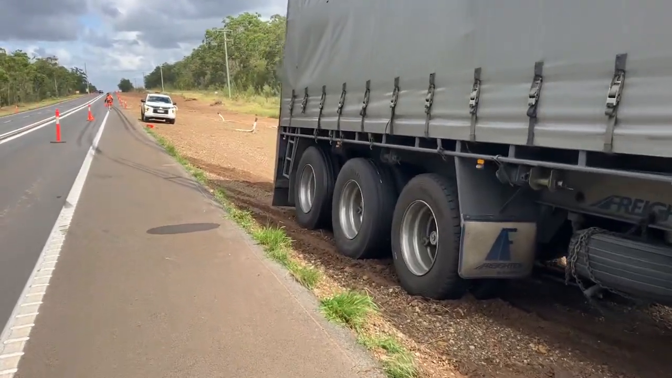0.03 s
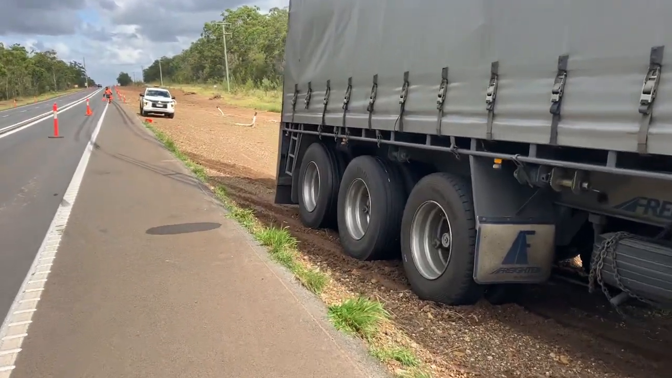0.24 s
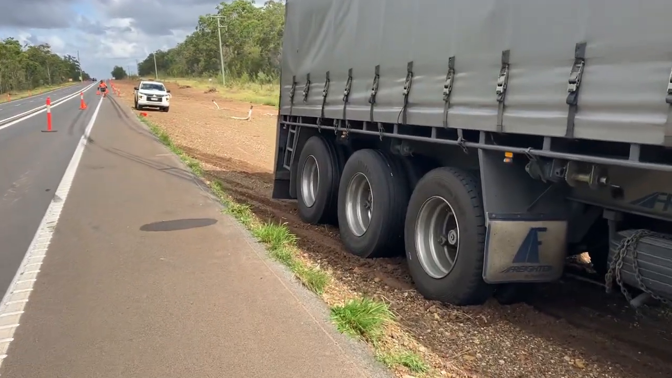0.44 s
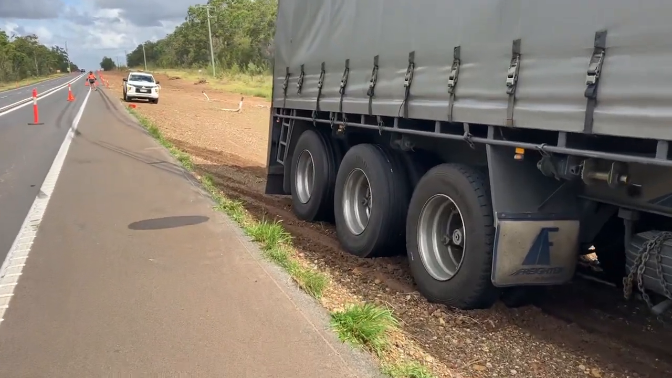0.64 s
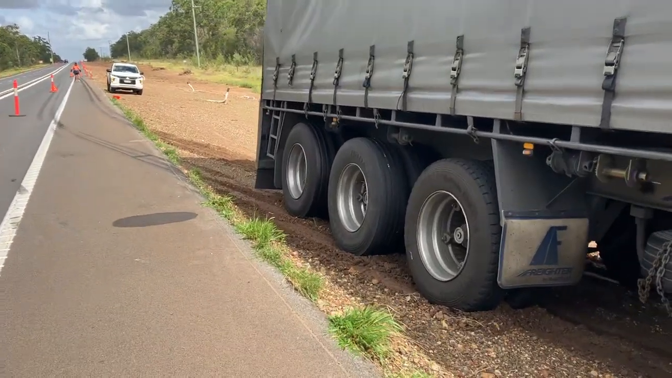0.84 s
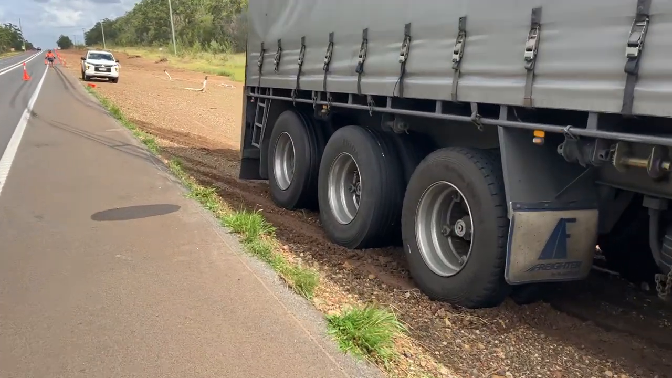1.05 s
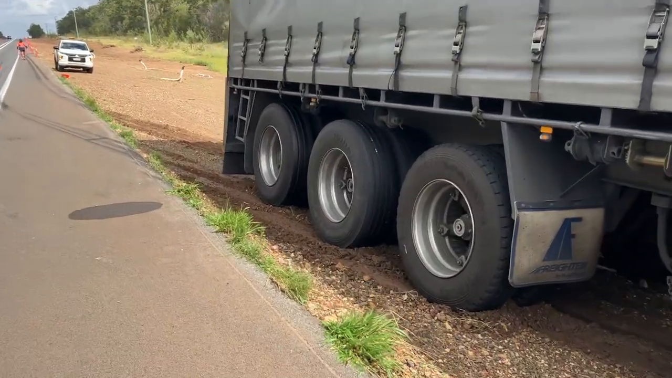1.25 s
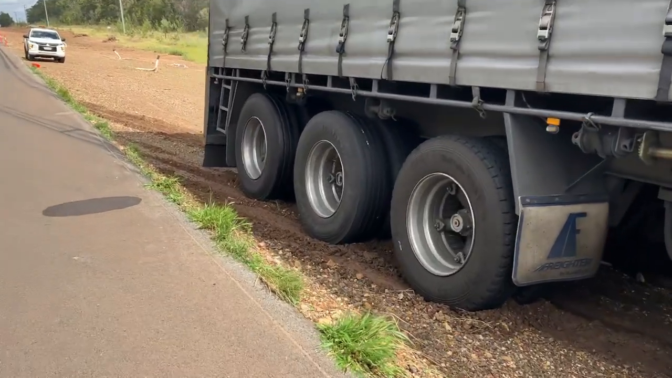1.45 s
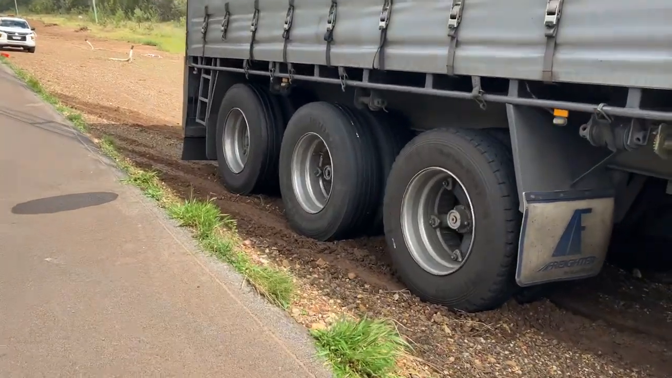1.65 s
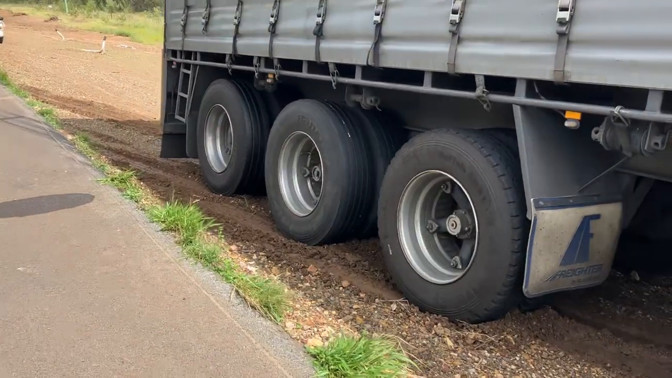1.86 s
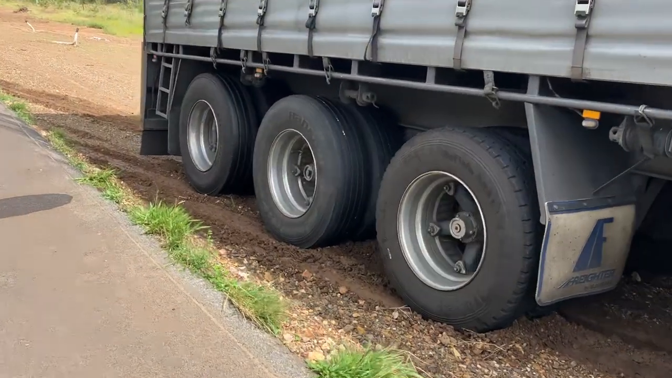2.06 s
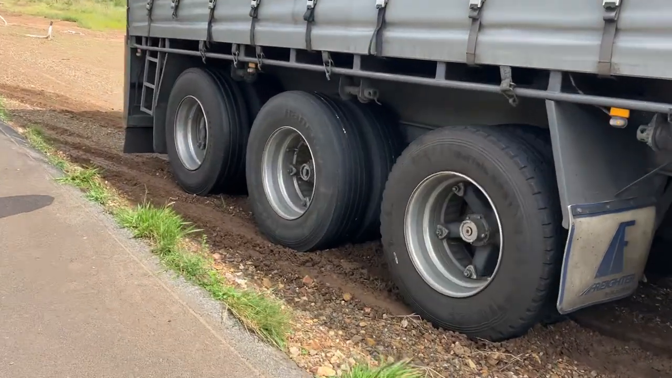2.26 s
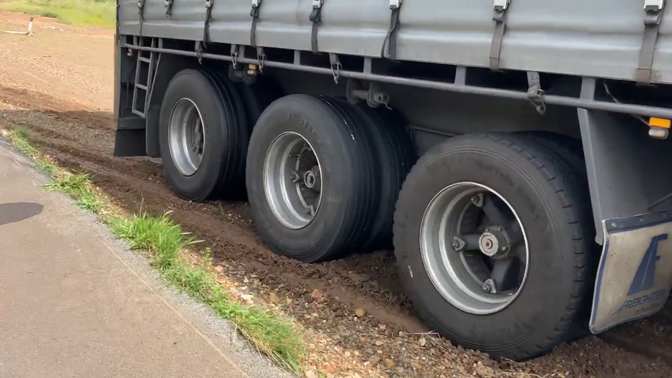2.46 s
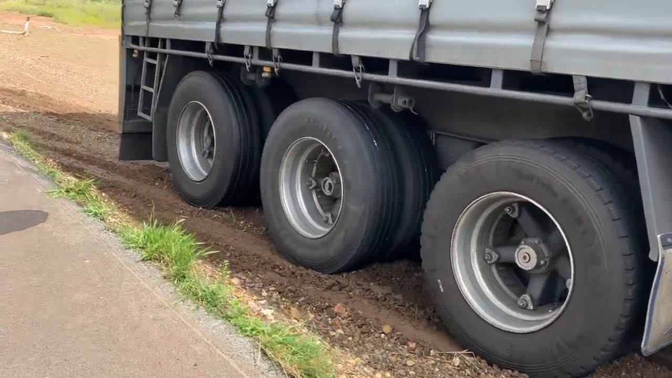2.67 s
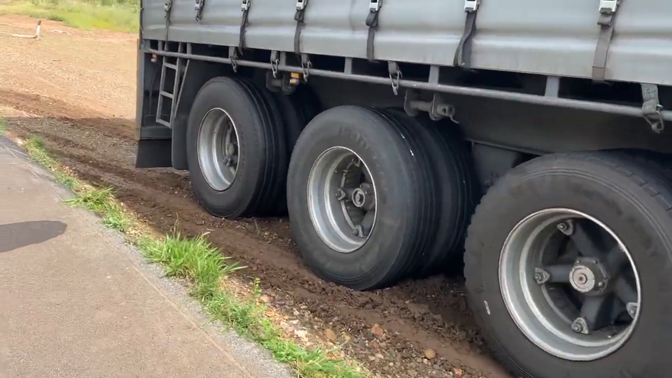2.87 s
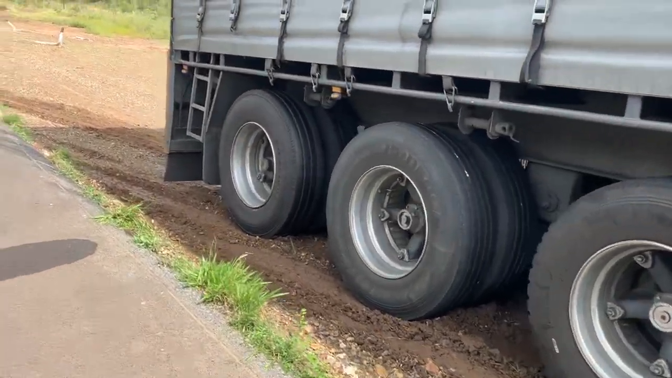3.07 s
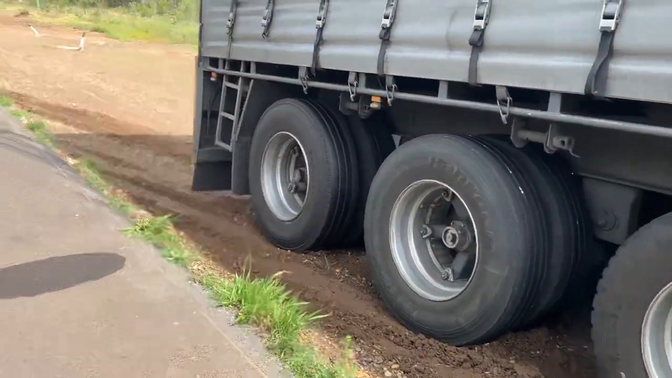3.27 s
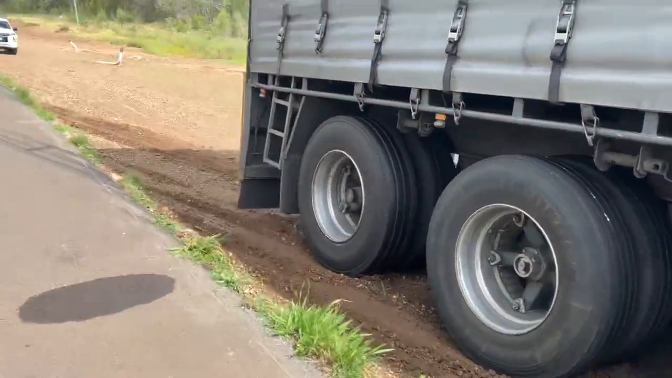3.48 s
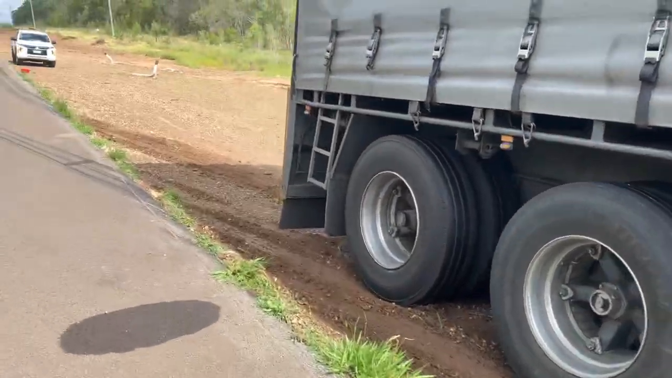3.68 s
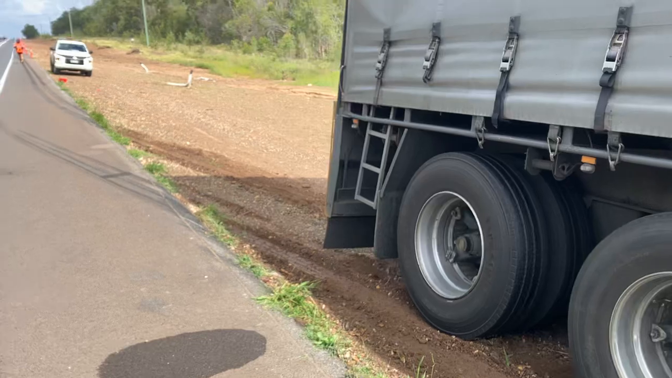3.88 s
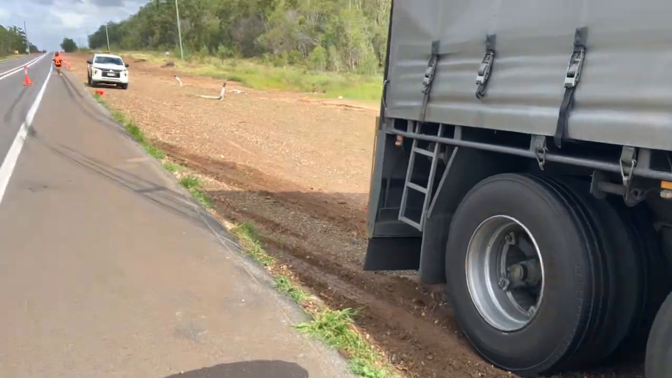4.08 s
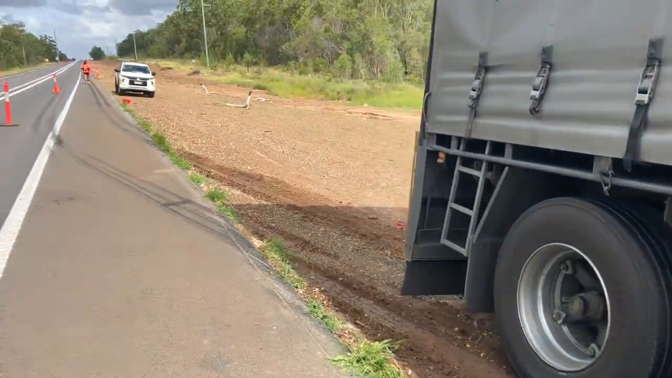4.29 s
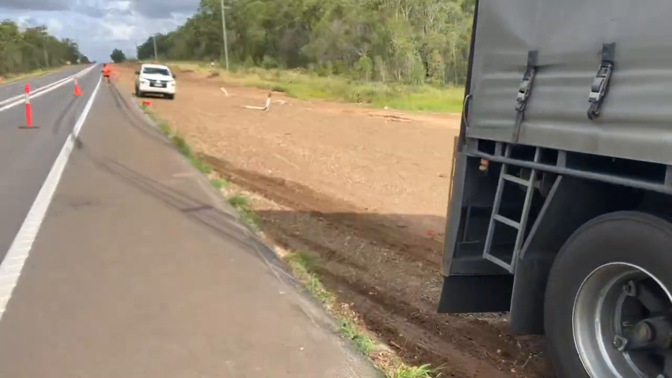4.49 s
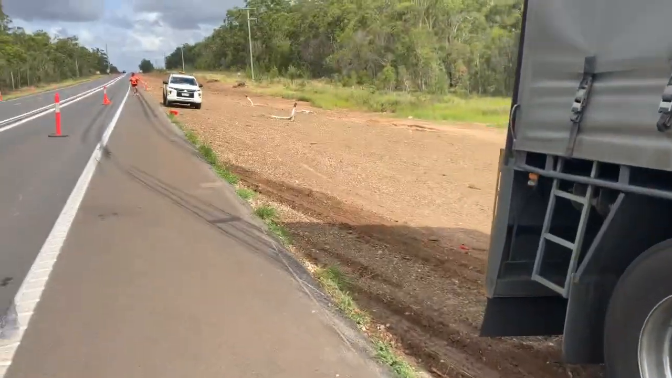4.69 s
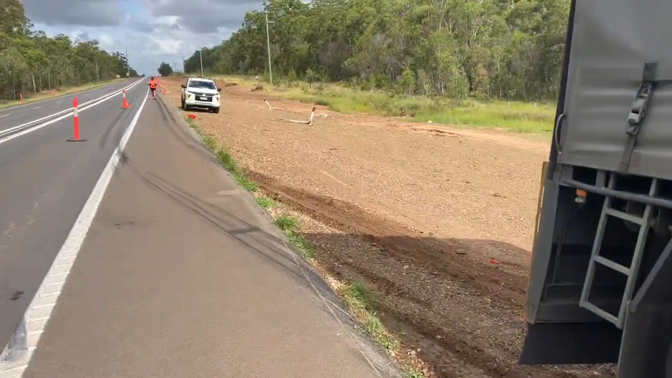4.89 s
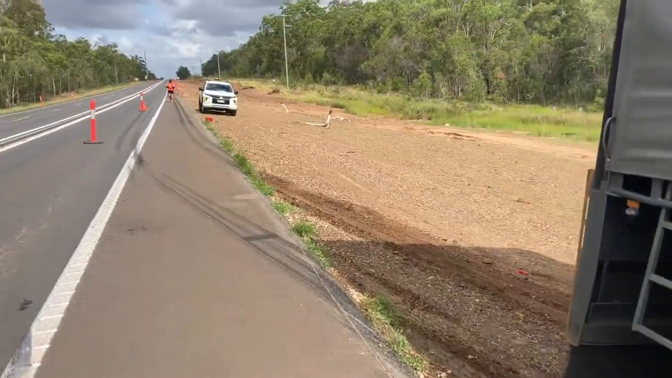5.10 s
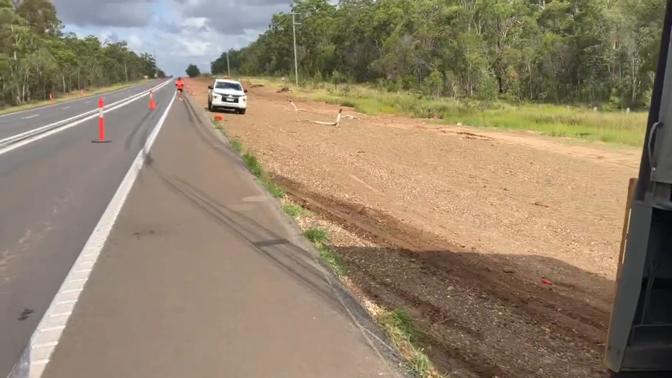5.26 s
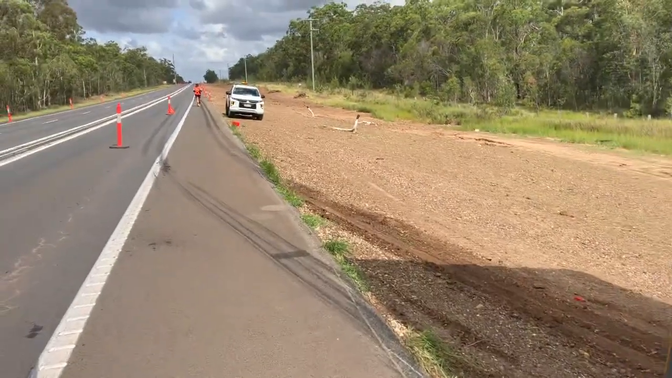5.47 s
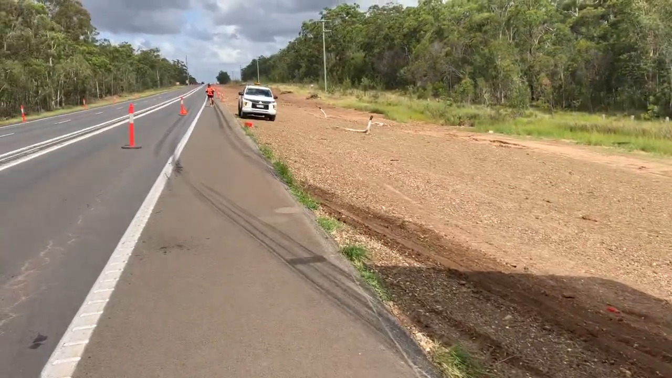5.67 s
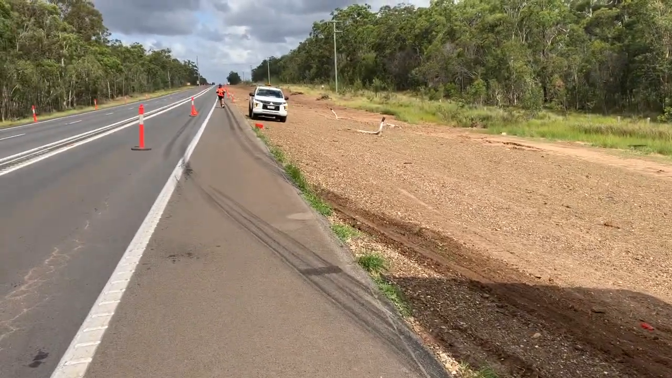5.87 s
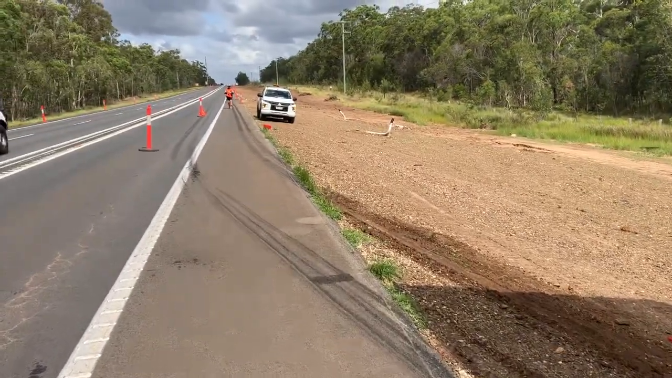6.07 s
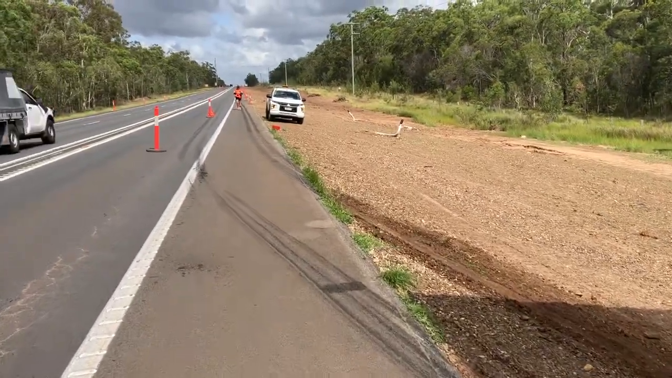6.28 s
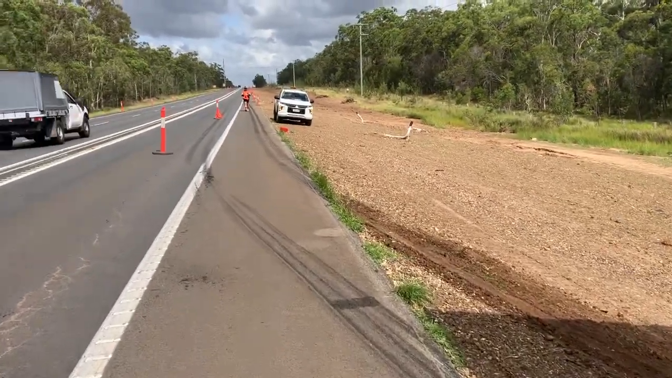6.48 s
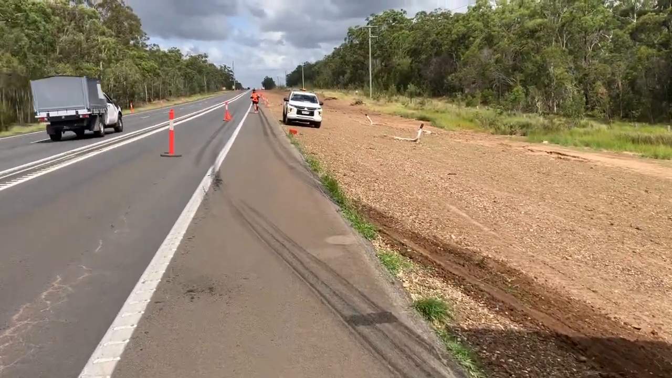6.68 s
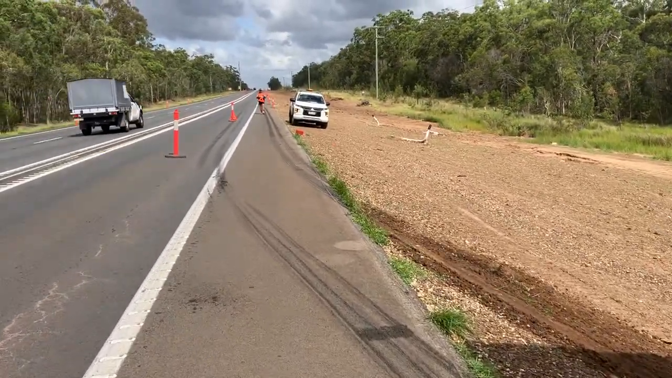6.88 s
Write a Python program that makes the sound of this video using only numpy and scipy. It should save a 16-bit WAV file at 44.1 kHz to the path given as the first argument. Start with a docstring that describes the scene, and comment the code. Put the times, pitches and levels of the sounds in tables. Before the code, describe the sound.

A diesel semi-trailer rumbles low on a gravel shoulder while a light truck rushes past on the left, peaking near five seconds, then fading.

```python
"""A light utility truck overtakes on the left: engine tones and noise, ringing boom and tyre roar, with Doppler on
the tones and boom, rise as it nears and fade up the road; an echo off a trailer's side combs them.
Beside it on the highway shoulder a diesel semi-trailer creeps over gravel: its exhaust note, overtones,
rumble, whirr and clatter come from sines and coloured noise; its firing rate picks up once, then holds.
Stones snap, a buckle ticks once and the roadside hisses faintly, all heard by a pair of microphones."""
import sys
import numpy as np
from scipy import signal
from scipy.fft import rfft, irfft, next_fast_len
from scipy.io import wavfile
from scipy.ndimage import uniform_filter1d, map_coordinates

SR = 44100
rng = np.random.default_rng(int(sys.argv[2]) if len(sys.argv) > 2 else 0)


def waveform_to_disk(signal):
    """Save audio, clipped to [-1, 1], as 16-bit WAV at the path in sys.argv[1]."""
    frames = np.transpose(np.atleast_2d(signal))
    scaled = np.clip(frames, -1, 1) * 32767
    samples = np.round(scaled).astype(np.int16)
    wavfile.write(sys.argv[1], SR, samples)


N = 306054
TIME = np.arange(N) / SR  # s

# Spectra called "noise colour" hold only relative levels: the noise is scaled to rms 1 afterwards.
# Level at which the diesel's exhaust note is heard, with sudden dips: start_s, level_db (before NOTE_DB)
DIESEL_NOTE_LEVEL = [(0.0, -38), (0.6, -46.5), (0.93, -29), (1.22, -43.5), (1.45, -32), (2.72, -28),
                     (2.82, -34.5), (3.81, -39), (3.92, -28.5), (4.27, -39.5), (4.31, -31), (4.52, -31),
                     (4.62, -45), (4.87, -28), (5.64, -25), (5.74, -33), (6.01, -23), (6.24, -33),
                     (6.4, -28), (6.75, -38.5), (6.9, -25.5), (6.94, -25)]
# Wavering tones of the diesel: multiple of the crank rate, level_db
DIESEL_ORDERS = [(1.5, -58), (4, -64), (4.6, -46), (5.9, -53), (10.6, -51)]
# Noise colour of the diesel's rumble: pitch_hz, level_db per Hz
RUMBLE_COLOUR = [(18, -36), (30, -8), (42, -1), (60, 3.5), (95, 1), (130, 2), (200, -3), (260, -4),
                 (400, -13.5), (475, -13.5), (600, -19.5), (1200, -54), (3000, -85)]
# Noise colour of the diesel's clatter: pitch_hz, level_db per Hz
CLATTER_COLOUR = [(300, -4), (600, 2), (1100, 1), (1500, -.7), (1850, 4.5), (2600, -6.5), (3350, -11.5),
                  (3900, -10.5), (6000, -21.5), (10000, -61)]
# Noise colour of the bright band of the diesel's machinery: pitch_hz, level_db per Hz
WHIRR_COLOUR = [(1600, -27), (2000, -5), (2400, 3), (2900, -1), (3400, -2), (3800, -20), (5000, -45)]
# The whirr swells, drops, then fades as the cab moves away: start_s, level_db
WHIRR_LEVEL = [(0, -63.5), (.7, -62), (1.12, -60), (1.38, -65), (2.2, -66), (3.5, -69)]
# The diesel's overtones: pitch_hz (at a firing rate of DIESEL_HZ), level_db (before the swell)
DRONE_TONES = [(137, -52), (157, -45.5), (179, -44), (198, -43), (321, -51), (481, -55.5)]
# Level at which those overtones are heard: start_s, level_db (gain)
DRONE_SWELL = [(0, -5.5), (1.1, -4.5), (1.8, 0), (2.9, 1.5), (3.9, 9), (4.4, 8), (4.7, 7), (5.2, 9.5),
               (5.7, -4), (6.94, -5)]
# Noise colour of the open roadside: pitch_hz, level_db per Hz
AIR_COLOUR = [(300, -10), (1000, 6), (3000, 2), (5500, -.5), (7700, 3.5), (9000, 3), (10700, -1),
              (12000, -7), (13500, -20), (16000, -32)]
# Gravel snapping under the trailer: start_s, level_db (initial gain of the burst)
STONES = [(0.4449, -43), (0.4663, -44), (1.0294, -47), (2.3761, -43), (2.8171, -46), (2.8365, -47),
          (3.3992, -47), (3.5494, -55), (3.9759, -40), (4.5421, -38)]
# Noise colour of a stone's snap: pitch_hz, level_db per Hz
SNAP_COLOUR = [(1000, -20), (3500, -2), (8000, -11), (14000, 1)]
# Ringing of a small metal fitting: pitch_hz, level_db (relative)
CLINK_TONES = [(2900, 6), (3300, 4), (3700, 1), (4600, 4), (5100, 2), (5500, 2)]
# Level law of each sound of the passing truck, before its mix trim: level_db (abreast),
# fall_db (per doubling of distance), loss_db_per_m, rear_db (gain to the rear), abreast_s, nearest_m
CARRY = {"boom": (-26.5, 0.5, 0.35, -4, 5.5, 9), "engine note": (-29, 3, 0.2, 1.8, 5, 10),
         "engine growl": (-26.3, 5.5, 0.13, 2.5, 5, 7.5), "roar": (-24, 4, 0.16, 4.5, 5.1, 6.5),
         "rasp": (-37, 9.5, 0, 8.5, 5, 11), "hiss": (-41.9, 11, 0, 7, 5, 12.5)}
# Passing engine's tones: multiple of the crank rate, level_db (relative), extra_db (while alongside)
FIRING_TONES = [(2, -7, 0), (3, -10.5, 1), (4, -5.5, 11), (5, -16, 4)]
# Exhaust and body resonances: pitch_hz (before Doppler), width_hz, level_db (relative)
BOOM_RESONANCES = [(96.7, 33, -7), (149.1, 13, -2), (169.5, 6.6, -1), (185.2, 8.5, -2), (200, 16.5, -4)]
# Noise colour of the passing engine's growl: pitch_hz, level_db per Hz
GROWL_COLOUR = [(60, -30), (110, -5.5), (240, -2.5), (320, 0), (420, -3), (600, -12.5), (1000, -83)]
# Noise colour of the tyre roar: pitch_hz, level_db per Hz
ROAR_COLOUR = [(250, -57), (480, -6.5), (650, 1), (820, 1.5), (1000, -2), (1300, -2.5), (1900, -12.5),
               (2800, -35), (5000, -69)]
# Noise colour of the tread noise beamed ahead: pitch_hz, level_db per Hz
HORN_COLOUR = [(950, -12), (1300, 15), (1650, 12), (2100, 1), (2700, -14), (5000, -38)]
# The exhaust whines in tones tied to the engine's firing: pitch_hz (before Doppler), level_db (against the
# roar)
WHINE_TONES = [(626, -12.5), (780, -17), (1177, -18)]
# Noise colour of the rasp: pitch_hz, level_db per Hz
RASP_COLOUR = [(1100, -23), (1800, -2), (2300, 1), (3200, -6), (4000, -8.5), (6000, -24.5)]
# Noise colour of air rushing round the passing truck: pitch_hz, level_db per Hz
HISS_COLOUR = [(2800, -22), (4300, 0), (6000, -1.5), (7600, -1), (9500, -5), (12000, -8.5), (13200, -22),
               (14200, -30), (16000, -34)]
# The truck's bearing from the turning microphones: start_s, lead_ms (of the left microphone)
BEARING = [(0, 0.24), (3.2, 0.36), (4.1, 0.19), (4.6, 0.18), (5.1, 0.34), (5.4, 0.34), (5.75, 0.27),
           (6.2, 0.22), (6.55, 0.16), (6.94, 0.12)]
# The trailer's slack curtain returns little treble: pitch_hz, level_db (gain)
ECHO_RESPONSE = [(100, -7.5), (1800, -2.5), (3300, -8), (5000, -20), (9000, -40)]
# Left microphone while the truck is still behind: pitch_hz, level_db (gain)
SHADOW_RESPONSE = [(200, -2.5), (700, 0), (1400, -3.5), (2400, -5.5), (4000, -3), (8000, -6)]
# Left microphone once the truck is in the open: pitch_hz, level_db (gain)
FACING_RESPONSE = [(200, 2), (450, -1), (750, 2), (1500, 0.3), (4000, 0), (8000, -2)]
# Stereo width of the microphone pair: pitch_hz, level_db (side gain)
WIDTH_RESPONSE = [(60, 0.5), (150, -5), (280, -5), (500, 2.5), (900, 0), (1800, -1), (8000, 0.5)]

# the diesel's firing rate picks up once, then holds
DIESEL_SLOW_HZ, DIESEL_HZ, PICK_UP_S, PICK_UP_WIDTH_S = 58.53, 60.42, 1.1, 0.03
NOTE_DB, NOTE_FLUTTER_DB = -0.2, 1.0  # gain of the exhaust note, and its quick unsteadiness
TURN_S, TURN_WIDTH_S = 1.64, 0.22  # the microphones turn from the engine towards the trailer's wheels
CLATTER_DB, CLATTER_TURNED_DB, CLATTER_DB_PER_S = -52.5, -2, 0.73  # start, change at the turn, growth
DIESEL_LEAD_MS, DIESEL_TURNED_LEAD_MS = 0.34, 0.22  # lead of the left microphone before and after the turn
BUCKLE_S, BUCKLE_T60_S = 2.851, 0.02
SOUND_SPEED_M_S = 343
SPEED_M_S, GAP_M, ABREAST_S = 20, 7, 5.23  # the truck's straight drive past the microphones
OPEN_S, OPEN_WIDTH_S, CLOSE_S, CLOSE_WIDTH_S = 4.79, 0.015, 5.71, 0.072  # its engine blares alongside
WHINE_FRONT_DB = -5  # the exhaust whine is weaker while it approaches
BEAM_S, BEAM_WIDTH_S = 4.64, 0.27  # the tyres' forward beam sweeps over the microphones
CLEAR_S, CLEAR_WIDTH_S = 5.11, 0.18  # from here on the truck is in front of the microphones, in the open
SCATTER_BEHIND_DB, SCATTER_AHEAD_DB = -1, -18  # gain of the sound scattered by the roadside
WAKE_BEHIND_DB, WAKE_AHEAD_DB = 1, -5.5  # gain of the air hiss that comes from all round
ECHO_S, ECHO_WIDTH_S = 5.74, 0.12  # the trailer's echo strengthens once the truck is well ahead
ECHO_BEHIND, ECHO_AHEAD = 0.029, 0.63  # echo strength before and after
ECHO_MS, ECHO_MS_PER_S = 1.494, 0.19  # echo delay when abreast, and its growth
ECHO_LEAD_MS = 0.1  # the echo arrives from nearly straight ahead
SHARED_HZ, SHARED_WIDTH_HZ = 6960, 530  # above this both channels carry the same treble
SHARED_LAG_S, IN_PHASE_HZ = 0.000225, 7050
TOP_HZ = 15800  # band limit of the microphones


def amp(db):
    """Decibels to gain."""
    return 10 ** (np.asarray(db) / 20)


def unit(x):
    """Scale to rms 1."""
    return x / np.sqrt(np.mean(x ** 2) + 1e-20)


def shape(points, hz):
    """Gain at hz, read between (pitch_hz, level_db) points on a log axis."""
    point_hz, db = np.transpose(points)
    return amp(np.interp(np.log(hz + 1), np.log(point_hz + 1), db))


def curves(rows):
    """One value per sample for each column after the time."""
    start_s, *columns = np.transpose(rows)
    return [np.interp(TIME, start_s, column) for column in columns]


def wobble(rate):
    """A smooth random curve with rate knots a second."""
    knots = rng.standard_normal(int(N * rate / SR) + 4)
    return map_coordinates(knots, [TIME * rate])


def step(at, width):
    """A smooth change from 0 to 1 around a moment."""
    return (1 + np.tanh((TIME - at) / (2 * width))) / 2


def blend(before, after, share):
    """Go from one value to another as share goes from 0 to 1."""
    return before + (after - before) * share


def filtered(x, response):
    """Sound x through a response of frequency."""
    size = next_fast_len(N + SR // 4)
    spectrum = rfft(x, size) * response(np.fft.rfftfreq(size, 1 / SR))
    return irfft(spectrum, size)[..., :N]


def noise(colour, channels=1):
    """Coloured noise of rms 1, unrelated between channels."""
    white = rng.standard_normal((channels, N))
    return unit(filtered(white, lambda hz: shape(colour, hz)))


def read(x, when):
    """The sound x at the given times."""
    return map_coordinates(x, [when * SR], mode="mirror")


def pair(x, lead_ms):
    """A source on the left reaches the left microphone first."""
    half_s = lead_ms / 2000
    return np.array([read(x, TIME + half_s), read(x, TIME - half_s)])


def diesel_rate():
    """The diesel's firings per second."""
    return blend(DIESEL_SLOW_HZ, DIESEL_HZ, step(PICK_UP_S, PICK_UP_WIDTH_S))


def diesel():
    """Six cylinders: a deep exhaust note, wavering crank orders, rumble, whirr and clatter pulsing with firing."""
    note_db, = curves(DIESEL_NOTE_LEVEL)
    whirr_db, = curves(WHIRR_LEVEL)
    turned = step(TURN_S, TURN_WIDTH_S)
    firing = 2 * np.pi * np.cumsum(diesel_rate()) / SR
    crank = firing / 3  # a four-stroke six fires three times a turn
    note_gain = amp(note_db + NOTE_DB + NOTE_FLUTTER_DB * wobble(12))
    note = note_gain * np.sqrt(2) * np.sin(firing)
    orders = 0
    for multiple, db in DIESEL_ORDERS:
        gain = amp(db + 3.2 * wobble(5))
        orders = orders + gain * np.sqrt(2) * np.sin(multiple * crank + 0.81 * wobble(6))
    clatter_db = CLATTER_DB + CLATTER_TURNED_DB * turned + CLATTER_DB_PER_S * TIME
    clatter = amp(clatter_db) * unit(noise(CLATTER_COLOUR)[0] * (1 + 0.29 * np.sin(firing)))
    whirr = amp(whirr_db + 0.85 * wobble(13)) * noise(WHIRR_COLOUR)[0]
    # part of the rumble is common to both microphones, part is unrelated
    rumble = amp(-40) * noise(RUMBLE_COLOUR)[0] + amp(-44) * noise(RUMBLE_COLOUR, channels=2)
    lead_ms = blend(DIESEL_LEAD_MS, DIESEL_TURNED_LEAD_MS, turned)
    return pair(note + orders + clatter + whirr, lead_ms) + rumble


def drone(rough, rough_per_khz):
    """Close engine overtones throb against each other and swell; the higher ones are more broken."""
    swell_db, = curves(DRONE_SWELL)
    turns = 2 * np.pi * np.cumsum(diesel_rate() / DIESEL_HZ) / SR
    tones = 0
    for hz, db in DRONE_TONES:
        waver = rough * wobble(5) + rough_per_khz * hz / 1000 * wobble(26)
        tones = tones + amp(db + 2.3 * wobble(8)) * np.sqrt(2) * np.sin(hz * turns + waver)
    return pair(amp(swell_db) * tones, lead_ms=0.54)


def air():
    """A faint, nearly even hiss of the open roadside, unrelated between the microphones."""
    return amp(-58.5 + 0.45 * wobble(5.64)) * noise(AIR_COLOUR, channels=2)


def gravel(life_s, grit_db, grains_per_s, spread_db):
    """Stones snap as dying noise bursts under the creeping wheels, over a faint random crackle of grit."""
    blows = 0
    for start_s, db in STONES:
        decay = np.exp(-np.abs(TIME - start_s) / life_s)
        blows = blows + amp(db) * (TIME >= start_s) * decay
    grain_gain = amp(spread_db * np.minimum(rng.exponential(size=N), 3))
    grains = (rng.random(N) < grains_per_s / SR) * grain_gain
    grit = amp(grit_db) * signal.lfilter([1], [1, -np.exp(-1 / (life_s * SR))], grains)
    grit_colour = [(1000, -13), (3500, 22), (8000, 9), (15000, -25)]  # pitch_hz, level_db per Hz
    return blows * noise(SNAP_COLOUR, channels=2) + grit * noise(grit_colour, channels=2)


def clink(at, db, t60):
    """A strap buckle on the trailer ticks once: roughened metal tones with a fast attack and decay."""
    since = np.maximum(TIME - at, 0)
    ring = 0
    for hz, level_db in CLINK_TONES:
        ring = ring + amp(level_db) * np.sin(2 * np.pi * hz * since + 2.6 * wobble(900))
    attack = 1 - np.exp(-since / 0.00046)
    return amp(db - 60 * since / t60) * attack * ring


def emission_time(speed, gap, nearest):
    """When the sound now arriving left a vehicle driving past (m/s, m, s): the Doppler shift."""
    sent = TIME
    for _ in range(3):  # refine the travel delay
        extra_m = np.hypot(gap, speed * (sent - nearest)) - gap
        sent = TIME - extra_m / SOUND_SPEED_M_S
    return sent


def carried(abreast_db, fall_db, loss_db_per_m, rear_db, abreast_s, nearest_m):
    """Level in dB of a passing source: it falls with distance and differs between front and rear."""
    along = SPEED_M_S * (TIME - abreast_s)
    distance = np.hypot(along, nearest_m)
    spreading_db = fall_db * np.log2(distance / nearest_m)
    loss_db = loss_db_per_m * (distance - nearest_m)
    return abreast_db - spreading_db - loss_db + rear_db * along / distance


def passing_boom(sent):
    """Exhaust and body ring in narrow low resonances, excited by noise."""
    def body(f):
        return sum(amp(db) / (1 + (2 * (f - hz) / width) ** 2) for hz, width, db in BOOM_RESONANCES)

    ring = signal.hilbert(filtered(rng.standard_normal(N), body))
    # the drive is steady, so the ring flutters without long swells
    swell = np.sqrt(np.abs(uniform_filter1d(np.abs(ring) ** 2, size=SR // 4)))
    return unit(read(ring.real / swell, sent))


def passing_engine(sent, growl_db, note_db, crank_hz, rough):
    """Firing tones sink in pitch over a broad growl as they go by; the upper ones blare alongside."""
    alongside = step(OPEN_S, OPEN_WIDTH_S) * (1 - step(CLOSE_S, CLOSE_WIDTH_S))
    phase = 2 * np.pi * crank_hz * sent
    tones = 0
    for multiple, db, extra_db in FIRING_TONES:
        gain = amp(db + extra_db * alongside + 3.2 * wobble(24))
        tones = tones + gain * np.sin(round(multiple) * phase + rough * wobble(32))
    return amp(note_db) * tones + amp(growl_db) * noise(GROWL_COLOUR)[0]


def exhaust_whine(sent, rough, waver_rate):
    """Wavering exhaust tones that sink with the engine and carry best to the rear."""
    front_db = WHINE_FRONT_DB * (1 - step(ABREAST_S, CLEAR_WIDTH_S))
    song = 0
    for hz, db in WHINE_TONES:
        gain = amp(db + front_db + 2.5 * wobble(10))
        song = song + gain * np.sqrt(2) * np.sin(2 * np.pi * hz * sent + rough * wobble(waver_rate))
    return song


def passing_tyres(sent, roar_gain):
    """Tyre roar and exhaust whine, plus noise that the wedge between tread and road beams forward."""
    beam = np.exp(-((TIME - BEAM_S) / BEAM_WIDTH_S) ** 2)
    song = exhaust_whine(sent, rough=0.77, waver_rate=22)
    return amp(-2.5) * roar_gain * (noise(ROAR_COLOUR)[0] + song + beam * noise(HORN_COLOUR)[0])


def trailer_echo(direct, strength):
    """The trailer's side returns a dulled copy a little late, which combs the direct sound."""
    late_s = (ECHO_MS + ECHO_MS_PER_S * (TIME - ABREAST_S)) / 1000
    dulled = filtered(direct, lambda hz: shape(ECHO_RESPONSE, hz))
    return strength * read(dulled, TIME - late_s)


def roadside_scatter(roar_gain, growl_db, rasp_gain, clear):
    """Roar, growl and rasp scattered by the roadside arrive unrelated at the two microphones."""
    scattered = roar_gain * noise(ROAR_COLOUR, channels=2)
    scattered = scattered + amp(growl_db + 3.0) * noise(GROWL_COLOUR, channels=2)
    scattered = scattered + amp(5.5) * rasp_gain * noise(RASP_COLOUR, channels=2)
    return amp(blend(SCATTER_BEHIND_DB, SCATTER_AHEAD_DB, clear)) * scattered


def housing(stereo, bend_hz, width_hz, through):
    """Sound from the road bends round the housing to the far microphone, with a dip and a turn of phase."""
    def bend(f):
        detuning = bend_hz ** 2 - f * f
        return (detuning - 1j * through * f * width_hz) / (detuning + 1j * f * width_hz)

    return np.array([stereo[0], filtered(stereo[1], bend)])


def passing_vehicle():
    """Engine and tyres arrive directly, off the trailer's side, and scattered by the roadside."""
    level_db = {name: carried(*row) for name, row in CARRY.items()}
    lead_ms, = curves(BEARING)
    clear = step(CLEAR_S, CLEAR_WIDTH_S)
    sent = emission_time(SPEED_M_S, GAP_M, ABREAST_S)

    growl_db = level_db["engine growl"]
    roar_gain = amp(level_db["roar"] + 0.74 * wobble(18))  # the road's texture shakes the tyre noise
    rasp_gain = amp(level_db["rasp"] + 0.94 * wobble(26))
    hiss_gain = amp(level_db["hiss"] + 0.7 * wobble(22))

    boom = amp(level_db["boom"]) * passing_boom(sent)
    engine = passing_engine(sent, growl_db - 2.5, level_db["engine note"], crank_hz=78.9, rough=1.0)
    rasp = amp(-1.1) * rasp_gain * noise(RASP_COLOUR)[0]
    hiss = amp(-6) * hiss_gain * noise(HISS_COLOUR)[0]
    direct = boom + engine + passing_tyres(sent, roar_gain) + rasp + hiss

    strength = blend(ECHO_BEHIND, ECHO_AHEAD, step(ECHO_S, ECHO_WIDTH_S))
    echo = trailer_echo(direct, strength)
    heard = (pair(direct, lead_ms) + pair(echo, ECHO_LEAD_MS)) / np.hypot(1, strength)
    heard = housing(heard, bend_hz=2850, width_hz=730, through=0.55)

    scattered = roadside_scatter(roar_gain, growl_db, rasp_gain, clear)
    # air hisses from all four wheels at once
    wake_gain = amp(blend(WAKE_BEHIND_DB, WAKE_AHEAD_DB, clear)) * hiss_gain
    left, right = heard + scattered + wake_gain * noise(HISS_COLOUR, channels=2)
    shadowed = filtered(left, lambda hz: shape(SHADOW_RESPONSE, hz))
    facing = filtered(left, lambda hz: shape(FACING_RESPONSE, hz))
    return np.array([blend(shadowed, facing, clear), right])


def scene():
    """The creeping semi-trailer, the open roadside and the overtaking truck together."""
    trailer = diesel() + drone(rough=0.6, rough_per_khz=2.0)
    stones = gravel(life_s=0.0024, grit_db=-64, grains_per_s=50, spread_db=3.5)
    buckle = clink(BUCKLE_S, db=-53, t60=BUCKLE_T60_S)
    return trailer + air() + stones + buckle + passing_vehicle()


def shared_treble(stereo):
    """In the top treble the right channel is a slightly earlier copy of the left."""
    def share(hz):
        return (1 + np.tanh((hz - SHARED_HZ) / SHARED_WIDTH_HZ)) / 2

    def early(hz):
        return np.sqrt(share(hz)) * np.exp(2j * np.pi * SHARED_LAG_S * (hz - IN_PHASE_HZ))

    own = filtered(stereo[1], lambda hz: np.sqrt(1 - share(hz)))
    return np.array([stereo[0], filtered(stereo[0], early) + own])


def record(dry):
    """The pair narrows the upper bass, widens the middle, shares the top treble and cuts above its band limit."""
    mid = (dry[0] + dry[1]) / 2
    side = filtered((dry[0] - dry[1]) / 2, lambda hz: shape(WIDTH_RESPONSE, hz))
    stereo = np.array([mid + side, mid - side]) * amp([[-0.2], [0.2]])  # left and right trim, dB
    return filtered(shared_treble(stereo), lambda hz: hz < TOP_HZ)


dry = scene()
out = record(dry)
waveform_to_disk(out)
```